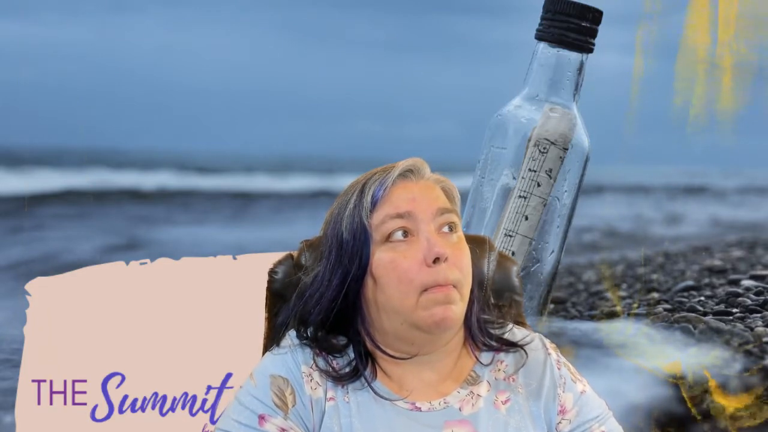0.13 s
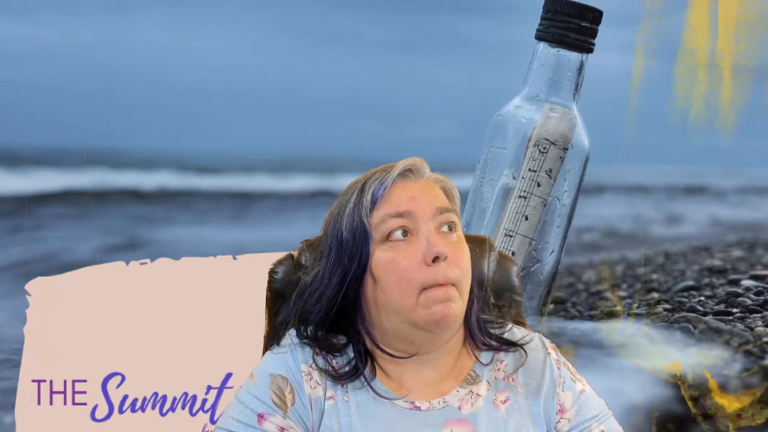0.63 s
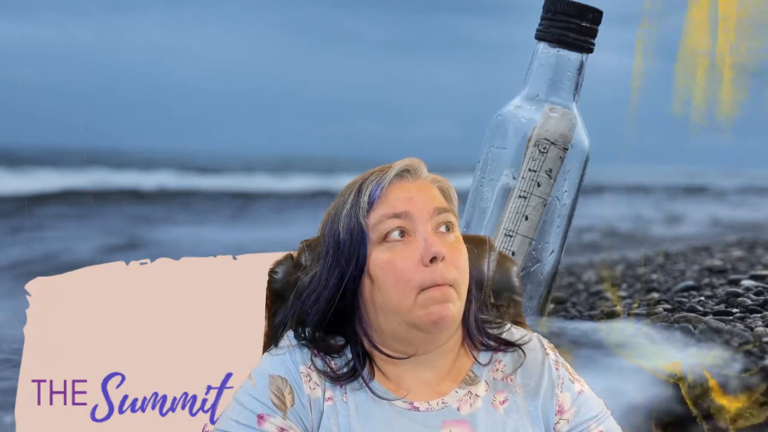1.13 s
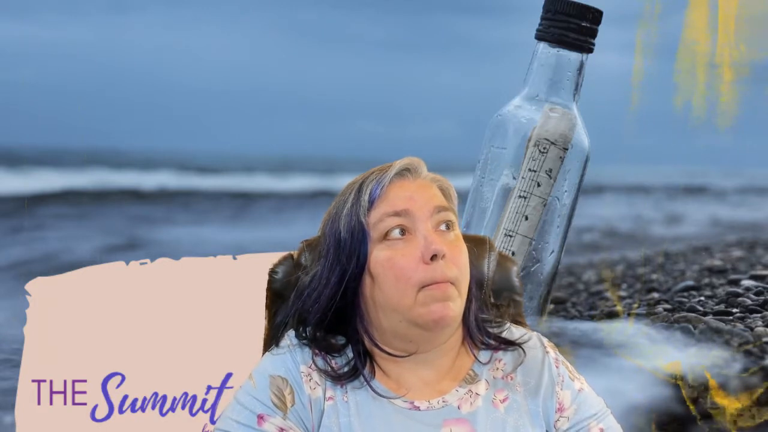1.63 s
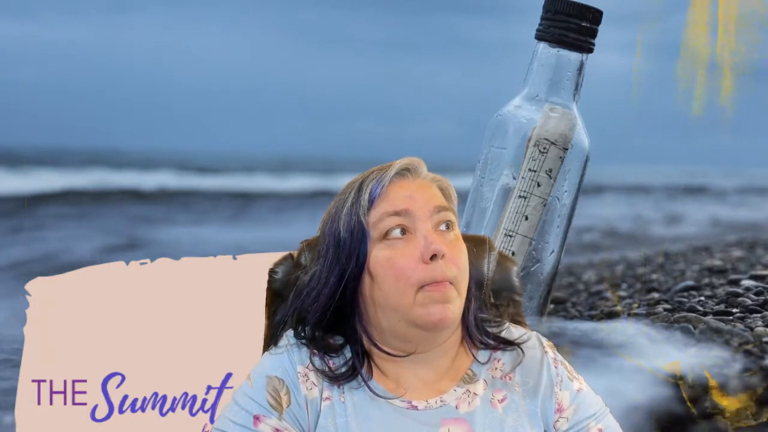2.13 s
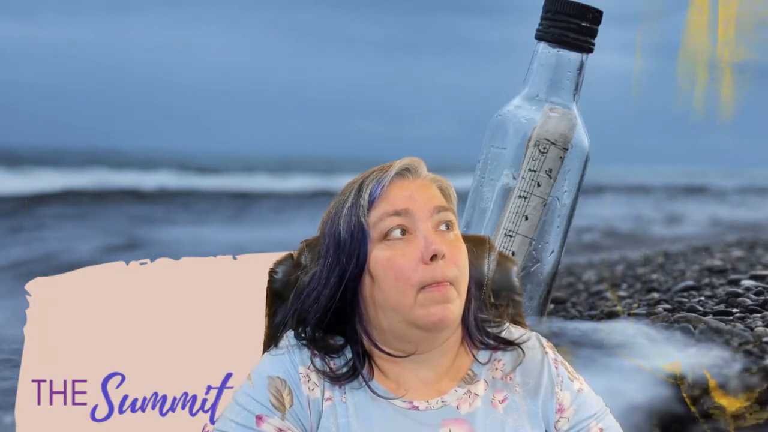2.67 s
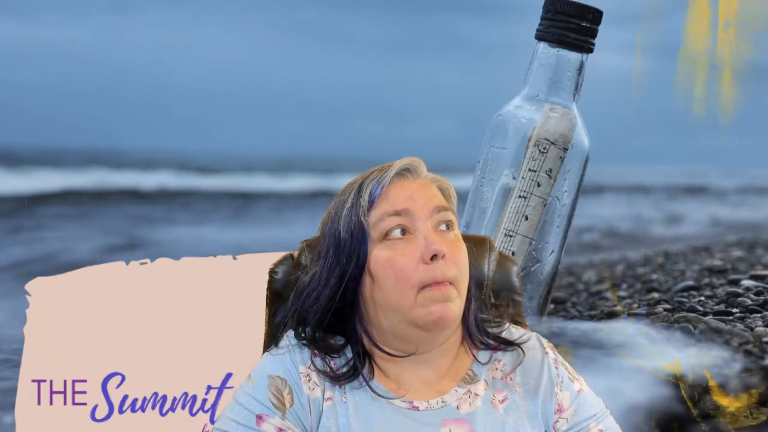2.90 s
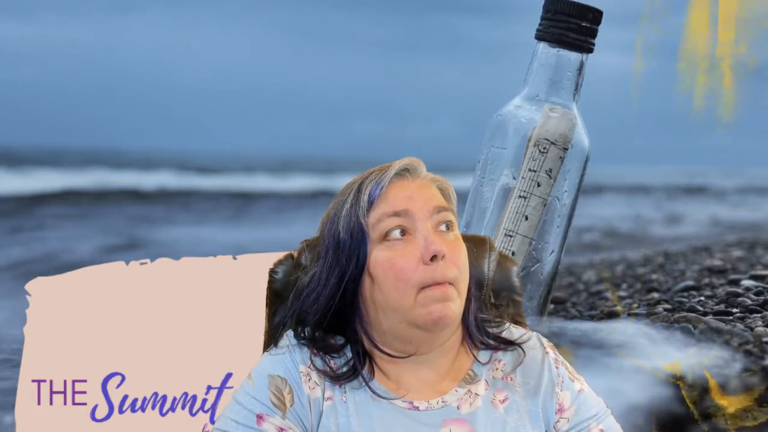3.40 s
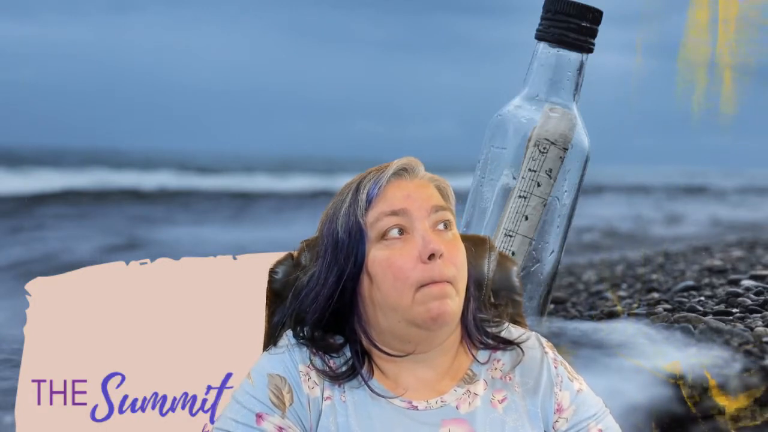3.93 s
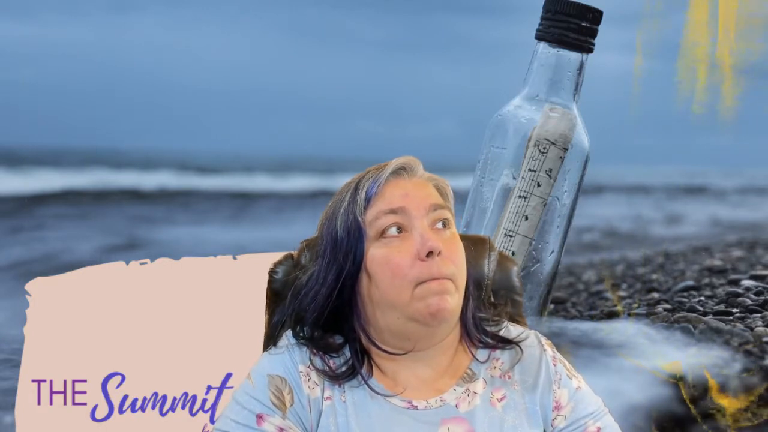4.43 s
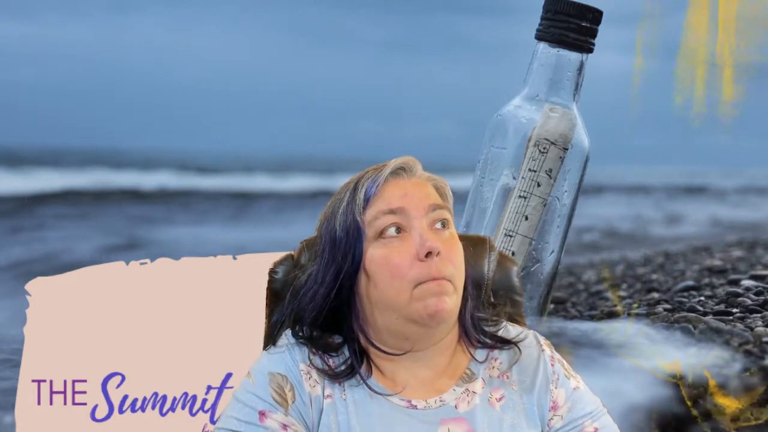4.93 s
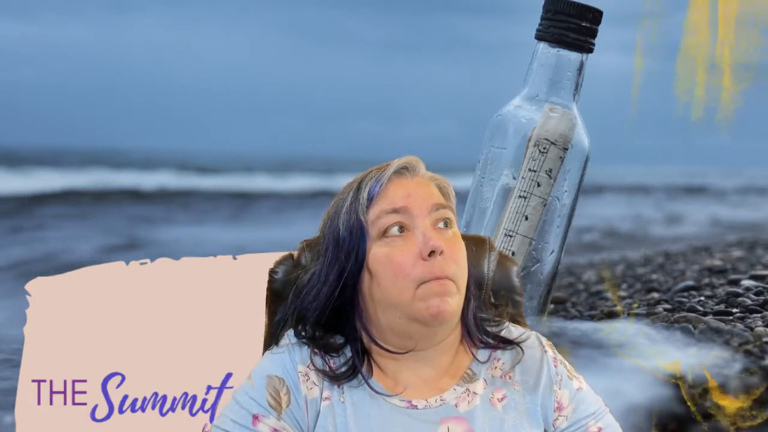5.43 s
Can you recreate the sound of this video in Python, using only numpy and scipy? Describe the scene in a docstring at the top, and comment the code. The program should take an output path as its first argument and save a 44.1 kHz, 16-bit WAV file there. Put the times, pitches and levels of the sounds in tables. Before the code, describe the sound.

Dry, sharp key clacks with short rattles and low desk thumps, recorded near in a small room with little echo. Strokes are irregular, thin out in the middle, then return quicker and denser. Occasional thin metallic pings and faint finger rubs on the caps lie between, above a quiet lumpy hum and hiss.

```python
"""Typing on a plastic keyboard

Heard close up in a small quiet room. Each key is touched, bottoms out a few ms later and rattles:
rough noise and a sharp blow set desk, case, keycap and stem ringing. A thin wire pings now and then,
fingertips rub the caps, and soft low thuds of desk and case, many under key strokes, are noise through
resonances. Below lie a lumpy low murmur, perhaps a fan, made of noise at a few fixed pitches, a thin
wavering tone and a hiss, ducked by a noise suppressor; sound beyond full scale clips."""
import sys
import numpy as np
from scipy import signal
from scipy.fft import rfft, irfft
from scipy.io import wavfile
from scipy.ndimage import uniform_filter1d

SR = 44100
rng = np.random.default_rng(int(sys.argv[2]) if len(sys.argv) > 2 else 0)


def natural_amplitude(level_db):
    """Convert a level in decibels to a linear amplitude factor, elementwise."""
    exponent = np.asarray(level_db, float) / 20
    return 10 ** exponent


def wav_record(signal):
    """Record a signal, one row per channel, as 16-bit PCM in the file named by sys.argv[1]."""
    frames = np.transpose(np.atleast_2d(signal))
    bounded = np.clip(frames, -1, 1)
    # unit amplitude maps onto the largest positive 16-bit level
    quanta = np.round(bounded * 32767).astype(np.int16)
    wavfile.write(sys.argv[1], SR, quanta)


N = 245180  # length in samples
TOUCH_S = 0.0035  # from first touch to the blow
# low resonances of thuds and murmur: f/Hz, width/Hz and relative level/dB (both for the murmur only)
LOW_RESONANCES = [(60, 9, -27.5), (130, 25, -51.5), (190, 19, -9.5), (250, 83, -21), (360.4, 76, -3.5),
                  (552.5, 18.6, 1.5), (735, 120, -15.5)]


def unit(x):
    """Scale a sound to rms 1."""
    return x / np.sqrt(np.mean(x ** 2))


def fade(t, t60_s):
    """Exponential decay that loses 60 dB in t60_s."""
    return np.exp(-np.log(1000) * t / t60_s)


def resonate(x, hz, width_hz):
    """One resonance: a narrow filter with gain 1 at its centre."""
    b, a = signal.iirpeak(hz, hz / width_hz, fs=SR)
    return signal.lfilter(b, a, x)


def low_pass(x, order, top_hz):
    """Dull a sound above top_hz."""
    b, a = signal.butter(order, top_hz, fs=SR)
    return signal.lfilter(b, a, x)


def band_pass(x, order, low_hz, high_hz):
    """Keep only the range between two frequencies."""
    return signal.sosfilt(signal.butter(order, (low_hz, high_hz), "band", fs=SR, output="sos"), x)


def smooth(x, size):
    """Moving average, taken twice."""
    return uniform_filter1d(uniform_filter1d(x, size=size), size=size)


def wander(x):
    """Slow random drift of spread 1, made by smoothing noise over some 20 ms."""
    return unit(smooth(x, 800))


def place(events):
    """Sum of (start s, sound) pairs; a sound may start up to a second early."""
    out = np.zeros(N + 2 * SR)
    for s, sound in events:
        i = int((s + 1) * SR)
        out[i:i + len(sound)] += sound
    return out[SR:SR + N]


def ring_modes(bright_hz, t):
    """What one blow rings: a decaying sine for each mode, a little different at every stroke."""
    # modes of the keyboard: f/Hz, relative level/dB, t60/s
    modes = [(60, -2, 0.14), (124.6, 6.5, 0.062), (150, -6.5, 0.018), (555, -42, 0.064), (675, 5, 0.097),
             (700, 11, 0.043), (795, 22.5, 0.022), (933, 14.5, 0.033), (1310, 4.5, 0.031),
             (1510, 7, 0.0096), (1710, -35, 0.005), (1935, 9.5, 0.011), (2161, 17.5, 0.0094),
             (2450, 3.5, 0.024), (2867, 10, 0.0091), (3444, 27, 0.0017), (4245, 21, 0.0012),
             (5055, 13, 0.0049), (5960, 19.5, 0.00057), (7130, 4, 0.0014), (8440, 17, 0.00097),
             (10100, 2.5, 0.0039), (10800, -2, 0.0048), (14500, -13, .002)]
    hz, db, t60_s = (column[:, None] for column in np.transpose(modes))
    high = hz > 1150  # the modes of keycap and stem
    # every key sits elsewhere, so it favours the cap and stem modes near its own pitch
    db = db + high * 14 * np.exp(-(np.log(hz / bright_hz) / 0.1) ** 2)
    db = db + 4.37 * rng.standard_normal(hz.shape)
    detune = np.where(high, 0.028, 0.011) * rng.standard_normal(hz.shape)
    # a hard crack, weaker and equally short in all modes, adds to each mode's own ring
    crack_db, crack_t60_s = -10.5, 0.0084
    decay = fade(t, t60_s) + natural_amplitude(crack_db) * fade(t, crack_t60_s)
    return hz[:, 0], natural_amplitude(db) * np.sin(2 * np.pi * hz * (1 + detune) * t) * decay


def strike(grit, t):
    """Force on the key: the stem scrapes down, bottoms out in a rough blow and bounces once."""
    touch_db, grit_db, blow_s = -34, -28, 0.0013
    bounce_s, bounce_db, contact_top_hz = 0.0055, -16, 9000
    after = t - TOUCH_S
    force = natural_amplitude(touch_db) * grit * (after < 0)
    force[int(TOUCH_S * SR)] += 1
    bounce_delay_s = bounce_s * natural_amplitude(1.5 * rng.standard_normal())
    force[int((TOUCH_S + bounce_delay_s) * SR)] += natural_amplitude(bounce_db)
    # plastic on plastic gives a little, which dulls the blow; its grit stays bright
    force = low_pass(force, 2, contact_top_hz)
    return force + natural_amplitude(grit_db) * grit * np.exp(-np.abs(after) / blow_s) * (after >= 0)


def chatter(grit):
    """The loose cap chatters: noise bunched into separate small knocks a few ms long."""
    bunching = unit(smooth(grit[::-1], 90))
    return unit(low_pass(unit(grit * natural_amplitude(2.84 * bunching)), 1, 9700))


def stroke(part_db, bright_hz):
    """One stroke: scrape, blow and rattle ring desk, case, keycap and stem."""
    # ranges of desk, case, keycap and stem: low f/Hz, high f/Hz
    parts_hz = [(25, 300), (500, 1150), (1150, 3200), (3200, 18000)]
    # chatter after the blow for the same four parts: level/dB, t60/s
    rattle = [(-33.5, 0.29), (-32, 0.076), (-30, 0.083), (-27.5, 0.1)]
    grit = rng.standard_normal(SR // 5)
    t = np.arange(len(grit)) / SR
    after = t - TOUCH_S
    mode_hz, rings = ring_modes(bright_hz, t)
    force, knocks = strike(grit, t), chatter(grit)
    out = np.zeros(len(t))
    for level_db, (low, high), (rattle_db, rattle_t60_s) in zip(part_db, parts_hz, rattle):
        rattling = natural_amplitude(rattle_db) * knocks * fade(np.abs(after), rattle_t60_s) * (after >= 0)
        part_rings = rings[(mode_hz > low) & (mode_hz < high)].sum(axis=0)
        ring = signal.fftconvolve(force + rattling, part_rings)[:len(t)]
        # each part radiates only within its own range
        ring = band_pass(ring, 4, low, high)
        # its level is set over 12.5 ms around the blow
        around_blow = ring[int(TOUCH_S * SR / 2):][:SR // 80]
        out += natural_amplitude(level_db) * ring / np.sqrt(np.mean(around_blow ** 2))
    return out


def keys():
    """All strokes and releases; the case passes a share of its blow on to the desk."""
    # strokes and releases, with rms around the blow:
    # t/s, case level/dB, keycap level/dB, stem level/dB, favoured f/Hz
    strokes = [(0.002, -32, -31.5, -31.5, 2450), (0.1599, -65, -41, -43.5, 2650),
               (0.2452, -40.5, -26.5, -35.5, 1490), (0.308, -49, -42, -45, 2190),
               (0.3145, -53, -33, -59.5, 2410), (0.339, -80, -65, -43.5, 4300),
               (0.447, -75, -80, -47.5, 5200), (0.5095, -52, -45.5, -52.5, 2280),
               (0.557, -41.5, -35.5, -40.5, 2450), (0.6665, -27.5, -25, -38, 2340),
               (0.7351, -95, -50, -54, 2320), (0.746, -17, -15.5, -30.5, 1850),
               (0.8788, -46, -48.5, -56.5, 2110), (1.0, -44, -35, -39.5, 2274),
               (1.069, -72, -59, -51.5, 4250), (1.1857, -25.5, -21.5, -32, 2280),
               (1.3012, -23, -13.5, -29, 2280), (1.328, -49, -31.5, -42, 2210),
               (1.4117, -43, -30, -43.5, 1510), (1.4375, -50, -33.5, -32.5, 3270),
               (1.4977, -55, -48.5, -57, 3640), (1.606, -19.5, -19.5, -32.5, 2050),
               (1.6527, -42, -39, -41.5, 2260), (1.8518, -57, -36.5, -32, 4630),
               (1.9668, -44, -43, -46, 2120), (2.2514, -67, -83, -79.5, 4700), (2.355, -80, -80, -59, 4820),
               (2.388, -81.5, -43.5, -55, 2150), (2.454, -76, -81, -53.5, 4820),
               (2.5181, -71, -46.5, -42, 4300), (2.7053, -36, -30, -30, 2670),
               (2.7928, -50, -47, -46.5, 3400), (2.8592, -52.5, -43.5, -50, 2280),
               (2.941, -84, -53.5, -45.5, 5460), (3.233, -20, -20.5, -36.5, 1890),
               (3.3013, -48, -27, -34, 2110), (3.3765, -66, -39.5, -34.5, 3080),
               (3.521, -75, -42.5, -48.5, 2240), (3.6617, -72, -31.5, -42.5, 2330),
               (3.6742, -92, -46, -56, 4950), (3.764, -44, -39.5, -50, 2320),
               (3.807, -80, -44.5, -34, 4140), (3.8752, -26, -27, -28, 3360),
               (4.0213, -27.5, -21.5, -21, 2290), (4.1644, -17, -12.5, -29.5, 2000),
               (4.2192, -18, -14.5, -30.5, 1890), (4.2955, -21, -18, -31, 2460),
               (4.365, -66, -23.5, -23.5, 4700), (4.3697, -34.5, -29, -23, 3860),
               (4.4941, -37.5, -26.5, -38, 1490), (4.578, -80, -45.5, -45.5, 2290),
               (4.5922, -45, -30, -45, 2065), (4.6901, -26, -25.5, -36, 1994),
               (4.7132, -36.5, -26.5, -39, 2210), (4.7532, -57.5, -44, -45, 2100),
               (4.8165, -25, -27, -34, 3120), (4.9021, -18, -11.5, -26, 1976), (4.983, -41, -43, -52, 1920),
               (5.1063, -37, -33, -27.5, 3560), (5.149, -78, -26, -40, 2090), (5.2948, -51, -42, -38, 3460),
               (5.3477, -44.5, -45.5, -42.5, 3580)]
    desk_db, desk_share = -30.5, 0.46
    sounds = []
    for s, case_db, cap_db, stem_db, bright_hz in strokes:
        part_db = (desk_db + desk_share * case_db, case_db, cap_db, stem_db)
        # the blow lands half a millisecond ahead of the listed time
        sounds.append((s - TOUCH_S - 0.0005, stroke(part_db, bright_hz)))
    return place(sounds)


def pings():
    """A thin spring wire pings: each rough scrape stirs its modes in another mix."""
    # pings, listed at their start: t/s, peak level/dB
    moments = [(.446, -61), (.998, -44), (1.067, -46.5), (2.246, -34), (3.677, -21.5), (3.806, -21),
               (3.995, -42)]
    # what the wire rings: f/Hz, relative level/dB, t60/s
    wire = [(4630, 11, 0.0057), (6570, -6.5, 0.011), (10450, -9.5, 0.012), (12060, 1.5, .012),
            (13200, -3, 0.0115), (15170, -16, .012)]
    scrape_t60_s = 0.046
    t = np.arange(SR // 8) / SR
    hz, db, t60_s = (column[:, None] for column in np.transpose(wire))
    mix_db = 5.0 * rng.standard_normal((len(moments), len(wire), 1))
    rings = (natural_amplitude(db + mix_db) * np.sin(2 * np.pi * hz * t) * fade(t, t60_s)).sum(axis=1)
    scrapes = rng.standard_normal(rings.shape) * fade(t, scrape_t60_s)
    rings = signal.fftconvolve(rings, scrapes, axes=1)[:, :len(t)]
    return place((s, natural_amplitude(peak_db) * ring / np.abs(ring).max())
                 for (s, peak_db), ring in zip(moments, rings))


def room(x):
    """Echoes of a small room: dense, slightly dull noise that dies away, convolved with the sound."""
    room_db, room_t60_s, top_hz = -22.5, 0.26, 11000
    t = np.arange(SR // 2) / SR
    tail = rng.standard_normal(len(t)) * fade(t, room_t60_s) * (t > 0.004)
    tail = low_pass(tail, 1, top_hz)
    return natural_amplitude(room_db) * signal.fftconvolve(x, tail / np.sqrt(np.sum(tail ** 2)))[:N]


def thuds():
    """Soft low thuds of desk and case, many under key strokes: noise bursts ring resonances near a pitch."""
    # thuds: t/s, pitch f/Hz, level/dB (3 dB below the peak)
    moments = [(.011, 302, -29), (.037, 555, -30.5), (.223, 197, -35.5), (.382, 735, -39), (.415, 271, -35),
               (.438, 555, -34.5), (.671, 140, -31), (.745, 139, -35.5), (.848, 590, -40.5),
               (.998, 305, -35.5), (1.087, 735, -36.5), (1.123, 555, -41.5), (1.25, 735, -50.5),
               (1.305, 168, -41.5), (1.42, 130, -38.5), (1.447, 129, -52), (1.508, 172, -37.5),
               (1.615, 120, -28), (1.747, 500, -36.5), (1.859, 150, -32), (2.005, 494, -37.5),
               (2.308, 540, -34.5), (2.398, 420, -41), (2.439, 555, -41.5), (2.482, 203, -31),
               (2.62, 365, -52), (2.635, 204, -31.5), (2.713, 222, -26), (2.9, 455, -35), (3.025, 555, -41),
               (3.237, 180, -37), (3.347, 640, -38), (3.442, 617, -33), (3.546, 250, -37.5),
               (3.63, 257, -32), (3.774, 198, -38.5), (3.833, 735, -37.5), (3.878, 604, -29.5),
               (3.883, 190, -27), (4.028, 328, -25), (4.12, 555, -35.5), (4.225, 202, -32.5),
               (4.3, 334, -26), (4.303, 133, -31.5), (4.374, 378, -20.5), (4.592, 190, -34.5),
               (4.82, 735, -40), (4.907, 181, -33), (5.459, 735, -39), (5.55, 234, -36.5)]
    throb_s, throb_width_hz, reach_octaves = 0.01, 86, 0.5
    t = np.arange(SR // 10) / SR
    bursts = rng.standard_normal((len(moments), len(t))) * (t / throb_s) * np.exp(-t / throb_s)
    rings = []
    for hz, _, _ in LOW_RESONANCES:
        ring = resonate(resonate(bursts, hz, throb_width_hz), hz, throb_width_hz)
        rings.append(ring / np.abs(ring).max(axis=1, keepdims=True))
    throbs = []
    for k, (s, pitch_hz, db) in enumerate(moments):
        # the further a resonance lies from the pitch, the less it sounds
        throb = sum(np.exp(-(np.log2(hz / pitch_hz) / reach_octaves) ** 2) * ring[k]
                    for (hz, _, _), ring in zip(LOW_RESONANCES, rings))
        throbs.append((s - 1.4 * throb_s, natural_amplitude(db) * np.sqrt(2) * throb / np.abs(throb).max()))
    return place(throbs)


def rubs():
    """Fingertips slide over the caps: soft swells of bright, grainy noise."""
    # rubs: t/s at the middle, length/s, level/dB at the middle
    slides = [(0.048, 0.053, -47.5), (1.468, 0.15, -52.5), (1.671, 0.12, -46), (4.058, 0.29, -55.5),
              (4.733, 0.12, -52), (5.122, 0.32, -54), (5.363, .14, -51), (5.503, 0.15, -52.5)]
    noise = band_pass(rng.standard_normal((len(slides), SR // 3)), 2, 2000, 7400)
    t = np.arange(SR // 3) / SR
    sounds = []
    for (s, length_s, db), grain in zip(slides, noise):
        swell = np.sin(np.pi * np.minimum(t / length_s, 1))
        sounds.append((s - length_s / 2, natural_amplitude(db) * unit(grain) * swell))
    return place(sounds)


def murmur():
    """A constant low, lumpy murmur, perhaps a fan: drifting noise through a few fixed resonances."""
    # the level drifts partly in common, partly in each resonance by itself
    shared = wander(rng.standard_normal(N))
    out = np.zeros(N)
    for hz, width_hz, db in LOW_RESONANCES:
        own = wander(rng.standard_normal(N))
        lumpy = rng.standard_normal(N) * natural_amplitude(3 * shared + 3 * own)
        out += natural_amplitude(db) * resonate(resonate(lumpy, hz, width_hz), hz, 2 * width_hz)
    return natural_amplitude(-47.5) * unit(out)


def tone():
    """A thin, unsteady tone: noise through two narrow resonances, wavering and briefly swelling."""
    # swells of the tone: t/s at the middle, level/dB (3 dB below the peak)
    swell_list = [(0.417, -47), (2.003, -45.5), (2.071, -44.5), (2.478, -49), (2.624, -52), (2.752, -43.5),
                  (3.439, -49), (3.626, -46), (3.715, -48.5), (3.839, -41.5)]
    tone_hz, width_hz, tone_db, swell_s = 1490, 9.9, -59.5, 0.013
    t = np.arange(N) / SR
    line = resonate(rng.standard_normal(N), tone_hz, width_hz)
    line = resonate(line, tone_hz, 4.1 * width_hz)
    steady = natural_amplitude(tone_db + 2.8 * wander(rng.standard_normal(N))) * unit(line)
    swells = sum(natural_amplitude(db) * np.exp(-((t - s) / swell_s) ** 2) for s, db in swell_list)
    # dividing by its envelope gives the swelling tone an even strength
    return steady + swells * np.sqrt(2) * line / np.abs(signal.hilbert(line))


def hiss():
    """Steady air and electronics noise: white noise shaped across frequency."""
    # shape of the hiss: f/Hz, relative level/dB per Hz
    shape = [(15, -69), (25, -51.5), (43, 8.5), (229, 13), (463, -7), (560, 9.5), (641, -2.5), (714, 5),
             (1040, 0.5), (1480, 0.5), (1740, -3), (4610, -11), (16000, -21.5)]
    f = np.maximum(np.fft.rfftfreq(N, 1 / SR), 1)
    hz, db = np.transpose(shape)
    gain = natural_amplitude(np.interp(np.log(f), np.log(hz), db))
    return natural_amplitude(-46) * unit(irfft(rfft(rng.standard_normal(N)) * gain, N))


def suppress(x):
    """Noise suppressor: turns each band down near its usual floor, opens at once and closes slowly."""
    least_db, hold_s, margin_db = -6, 0.025, 3.5
    frames = signal.stft(x, nperseg=512)[2]
    keep = np.exp(-256 / SR / hold_s)  # frames lie 256 samples apart
    power = uniform_filter1d(np.abs(frames) ** 2, size=11, axis=-2)
    floor = np.percentile(power, 30, axis=-1, keepdims=True)
    # the opening saturates, so the hold after a loud stroke is short
    held = signal.lfilter([1 - keep], [1, -keep], np.minimum(power, 300 * floor), axis=-1)
    # twice the dB, as this is a ratio of powers
    gain = 1 - natural_amplitude(2 * margin_db) * floor / np.maximum(held, power)
    gain = np.clip(gain, natural_amplitude(least_db), 1)
    return signal.istft(frames * gain, nperseg=512)[1][..., :N]


def scene():
    """Keys and pings with their room, then thuds, rubs, murmur, tone and hiss; one channel."""
    typed = keys() + pings()
    return (typed + room(typed) + thuds() + rubs() + murmur() + tone() + hiss())[None]


def roll_off(x):
    """The treble ends steeply here."""
    return signal.sosfilt(signal.butter(12, 16450, fs=SR, output="sos"), x)


def record(dry):
    """The microphone loses deep bass and top, noise is suppressed, and the input clips at full scale."""
    low_hz, top_hz = 51, 15800
    heard = signal.sosfilt(signal.butter(2, low_hz, "high", fs=SR, output="sos"), dry)
    heard = signal.sosfilt(signal.ellip(8, 0.2, 50, top_hz, fs=SR, output="sos"), heard)
    clipped = np.clip(suppress(heard), -1, 1)
    return roll_off(clipped)


dry = scene()
out = record(dry)
wav_record(out)
```